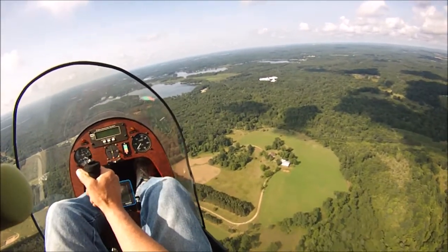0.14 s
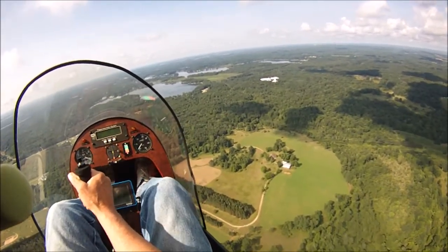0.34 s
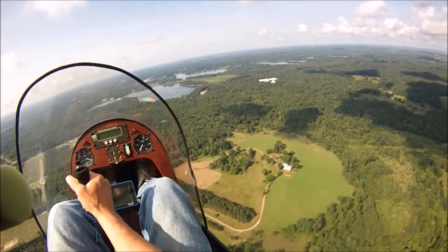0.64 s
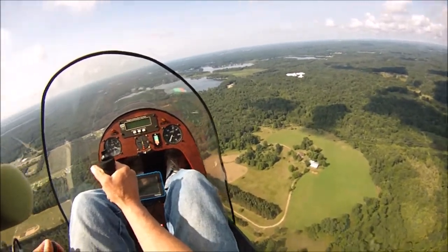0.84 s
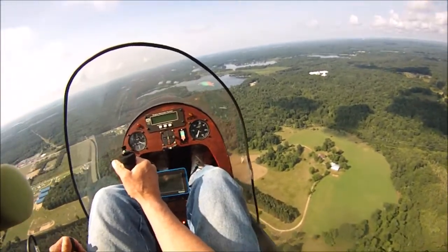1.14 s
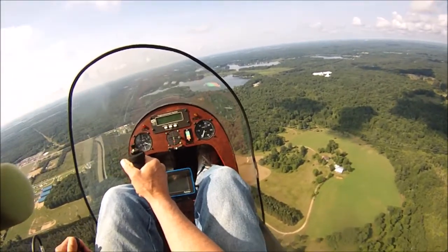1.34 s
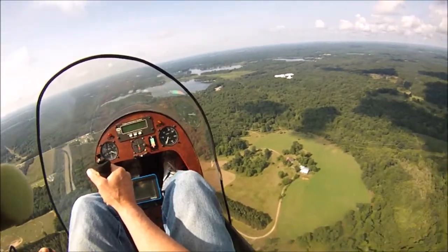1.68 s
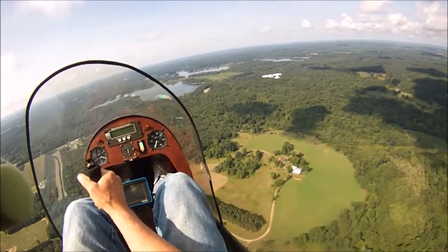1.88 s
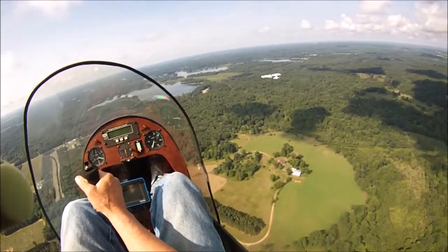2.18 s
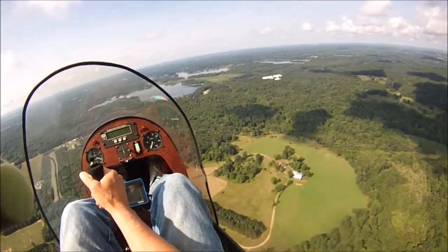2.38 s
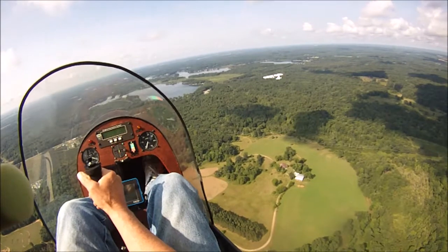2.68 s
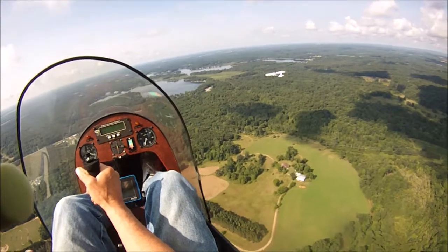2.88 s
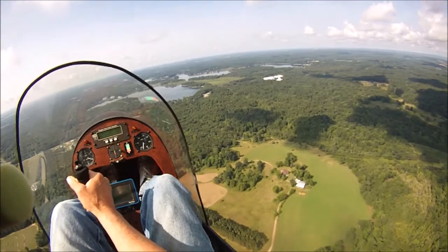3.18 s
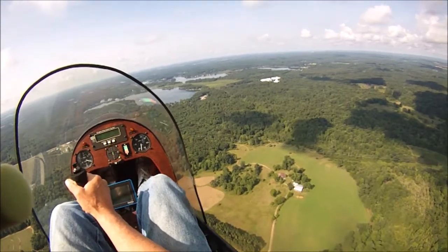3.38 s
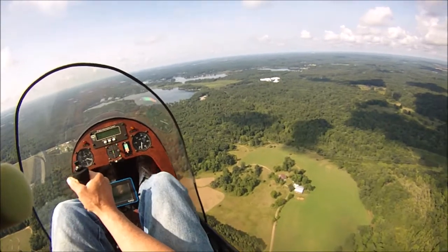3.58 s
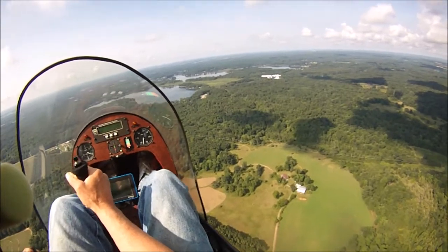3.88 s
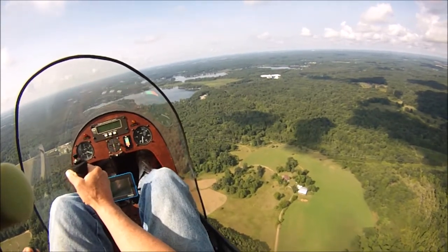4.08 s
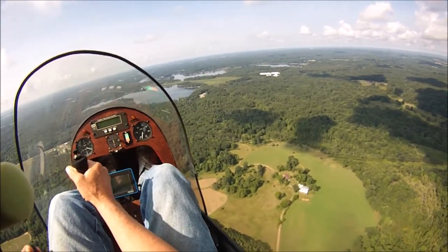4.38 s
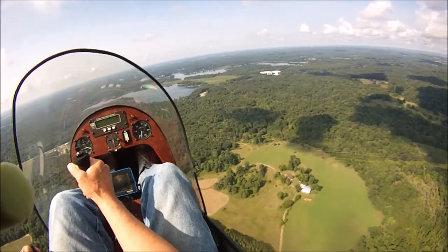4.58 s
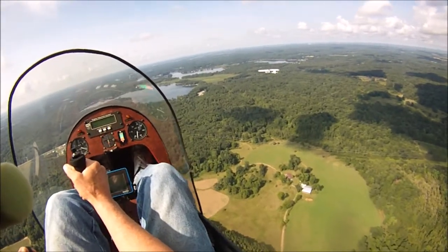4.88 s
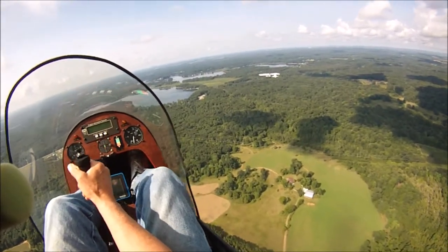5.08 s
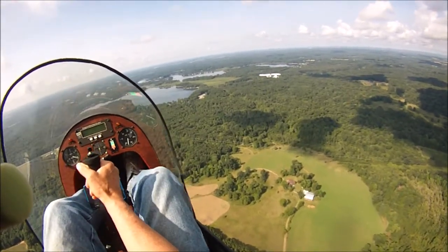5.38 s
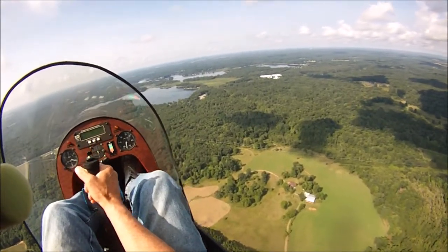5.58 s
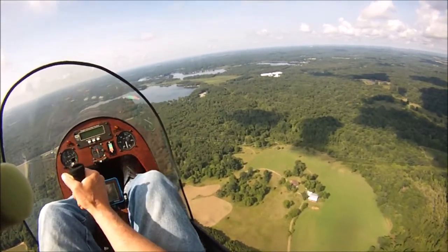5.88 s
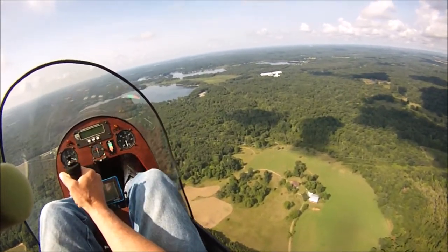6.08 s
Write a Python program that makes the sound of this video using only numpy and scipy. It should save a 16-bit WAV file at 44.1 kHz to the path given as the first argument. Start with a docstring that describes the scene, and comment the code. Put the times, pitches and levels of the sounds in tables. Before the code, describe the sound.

A small two-stroke aircraft engine drones at a steady cruising speed, with a wavering gear whine and a thin metallic buzz above it. The propeller adds a low, pulsing hum and a fluttering wash of air. The microphone sits in the open cockpit, where wind buffets it and hisses past the windscreen. The wind is gustiest at first, then eases a little, with a few short whooshes along the way.

```python
"""Ultralight in cruise, open cockpit

A two-cylinder two-stroke drones and whines behind the seat and drives a three-blade propeller through
a reduction gear, so two families of tones beat. The blades chop the air into a fluttering wash and
the airframe rasps. The slipstream buffets the microphone and hisses past the windscreen."""
import sys
import numpy as np
from scipy import signal
from scipy.fft import rfft, irfft, next_fast_len
from scipy.io import wavfile
from scipy.ndimage import map_coordinates

SR = 44100
rng = np.random.default_rng(int(sys.argv[2]) if len(sys.argv) > 2 else 0)


def master(y):
    """Save y as 16-bit WAV."""
    cut = np.clip(np.atleast_2d(y).T, -1, 1)
    pcm = np.round(cut * 32767)  # scale
    wavfile.write(sys.argv[1], SR, pcm.astype(np.int16))


N = 275625


def engine(turns):
    """Two firings a turn make the drone; casing and gears add ringing, whine, whistle and buzz."""
    # exhaust tones: t/s, level/dB at crank orders 1, 2, 4
    exhaust_levels = [(0.0, -46.5, -39.5, -44), (0.5, -45, -41, -49), (0.9, -43.5, -41, -52),
                      (1.3, -50, -41, -47.5), (1.9, -45.5, -38.5, -47), (2.5, -49, -39, -47),
                      (3.1, -40, -38, -48.5), (3.9, -43.5, -39, -46.5), (4.9, -43, -39.5, -50),
                      (5.4, -42, -37.5, -46), (5.75, -46, -40.5, -46), (6.25, -43.5, -37.5, -45.5)]
    # casing and gear tones: crank order, relative level/dB
    casing_orders = [(8, -16), (12, -10.5), (13, -13.5), (14, -10), (15, -20.5), (16, -15), (17, -7.5),
                     (18, -8), (19, -10), (21, -18.5), (22, -15.5), (23, -16.5), (24, -23), (25, -32),
                     (28, -27), (30, -36), (32, -28.5), (34, -28), (35, -21), (36, -15.5), (37, -20),
                     (38, -18.5), (40, -25.5), (41, -18.5), (42, -26), (44, -26.5), (50, -30.5), (60, -36),
                     (61, -36.5), (62, -36), (66, -40), (69, -37), (72, -40.5), (74, -36), (75, -40.5),
                     (76, -35.5), (83, -40), (84, -39), (87, -41), (90, -42), (93, -41), (106, -44)]
    # strongest casing tone: t/s, level/dB
    whine_levels = [(0.0, -60.5), (0.8, -61), (1.2, -62.5), (2.2, -59), (2.8, -61.5), (3.3, -60),
                    (3.7, -57.5), (4.25, -60), (4.5, -60), (4.9, -59.5), (5.3, -57.5), (5.7, -58.5),
                    (6.05, -54.5), (6.25, -53.5)]
    # faint high tone: t/s, level/dB
    whistle_levels = [(0.0, -90), (0.95, -83.5), (1.6, -85.5), (2.6, -87.5), (3.2, -93), (3.8, -85),
                      (4.6, -89), (5.25, -84), (5.7, -90), (6.25, -85)]
    whine_db, = curves(whine_levels)
    whistle_db, = curves(whistle_levels)
    drone = sum(amp(db) * tones(turns, [(order, 0)], waver_db=0.4, drift_rad=0.14)
                for order, db in zip((1, 2, 4), curves(exhaust_levels)))
    casing = amp(-58.5) * tones(turns, casing_orders, waver_db=2.5, drift_rad=0.38)
    whine = amp(whine_db) * tones(turns, [(20, 0)], waver_db=0.9, drift_rad=0.15)
    whistle = amp(whistle_db) * tones(turns, [(82, 0)], waver_db=0.8, drift_rad=0.6)
    return drone + casing + casing_swells(turns) + whine + whistle + amp(-77.5) * clatter(turns)


def casing_swells(turns):
    """Single casing tones rise and sink in smooth arches."""
    # swells: peak t/s, half-length/s, crank order, level/dB
    swells = [(0.48, 0.37, 18, -55.5), (0.99, 0.31, 18, -54), (1.9, 0.3, 18, -64.5), (3.2, 0.22, 18, -61),
              (3.51, 0.11, 18, -55.5), (3.95, 0.24, 18, -56.5), (4.6, 0.5, 18, -57),
              (5.43, 0.23, 18, -59.5), (5.95, 0.17, 18, -52), (0.53, 0.44, 32, -72), (5, 0.61, 32, -81),
              (3.25, 0.4, 72, -85), (6.15, 0.5, 74, -86.5), (1.6, 0.6, 76, -90), (5.8, 0.6, 76, -88.5),
              (5.95, 0.6, 76, -91), (4.7, 0.7, 84, -92.5), (5.15, 0.7, 106, -93)]
    t = np.arange(N) / SR
    out = np.zeros(N)
    for peak_s, half_s, order, db in swells:
        near = np.abs(t - peak_s) < half_s
        arch = np.cos(np.pi / 2 * (t[near] - peak_s) / half_s) ** 2
        phase = 2 * np.pi * (order * turns[near] + rng.random())
        out[near] += np.sqrt(2) * amp(db) * arch * np.sin(phase)
    return out


def clatter(turns):
    """Each crank turn repeats one rattle at a random strength: a thin buzz."""
    # buzz spectrum: f/Hz, relative level/dB
    buzz_spectrum = [(3400, -15.5), (3700, 0.5), (4500, 4), (5100, -4), (6000, -3.5), (6600, -0.5),
                     (7200, -6), (8300, -7), (10000, -20.5), (13000, -36.5)]
    tick_at = np.interp(np.arange(1, int(turns[-1])), turns, np.arange(N))
    strength = 1 + 0.3 * rng.standard_normal(len(tick_at))
    taps = tick_at.astype(int)[:, None] + np.arange(-7, 9)
    offset = taps - tick_at[:, None]
    ticks = strength[:, None] * np.sinc(offset) * np.sinc(offset / 8)  # sub-sample timing
    train = np.bincount(np.clip(taps, 0, N - 1).ravel(), ticks.ravel(), N)
    t = np.arange(SR // 20) / SR
    t60_s = 0.15
    ring = rng.standard_normal(len(t)) * amp(-60 * t / t60_s)  # dense metal modes smear each tick
    return coloured(signal.fftconvolve(train, ring)[:N], buzz_spectrum)


def propeller(passes, wind_db, gust_db):
    """Blades hum, thrum and chop disturbed air; gusts turn their weaker tones into wash."""
    # hum: t/s, level/dB at blade orders 2, 4
    hum_levels = [(0.0, -51, -51), (0.45, -36.5, -49.5), (0.75, -45, -46), (1.3, -38.5, -56),
                  (1.7, -40, -58), (2.4, -40, -66.5), (3.1, -35.5, -48), (3.5, -37.5, -53),
                  (4.8, -35.5, -55), (5.4, -38, -58.5), (6.0, -37.5, -51.5), (6.25, -41.5, -54.5)]
    # weaker tones: blade order, relative level/dB
    blade_orders = [(1, -17), (3, -15), (5, -30.5), (6, -23), (8, -38.5), (9, -35.5), (10, -34.5),
                    (11, -28.5), (12, -34), (13, -30), (14, -29.5), (15, -31.5), (16, -27.5), (17, -31),
                    (28, -42.5)]
    # low thrum: t/s, level/dB
    thrum_levels = [(0.0, -37.5), (0.5, -39), (1.1, -37), (1.55, -39.5), (1.75, -38), (2.0, -38.5),
                    (2.7, -41), (3.2, -42), (3.55, -37.5), (3.9, -44), (5.2, -42.5), (6.25, -41.5)]
    # chop: blade order, depth/dB
    chop_depths = [(1 / 3, 0.6), (1, 0.6), (2, 3.3), (3, 0.4), (4, 1.2)]
    # thrum and wash spectra: f/Hz, relative level/dB
    thrum_spectrum = [(140, -20.5), (176, -4), (198, -1), (214, -1), (231, -5), (256, -7.5), (301, -10.5),
                      (341, -12), (402, -16), (600, -32), (1200, -85)]
    wash_spectrum = [(500, -3.5), (780, -19), (1000, -4.5), (1400, 4), (1600, -1.5), (1800, -10.5),
                     (2080, -17.5), (2400, -19), (3300, -25.5), (3800, -33.5), (6000, -62.5)]
    hum = sum(amp(db) * tones(passes, [(order, 0)], waver_db=1.6, drift_rad=0.19)
              for order, db in zip((2, 4), curves(hum_levels)))
    weak_tones = amp(-36 - wind_db - gust_db) * tones(passes, blade_orders, waver_db=0.9, drift_rad=0.16)
    thrum_db, = curves(thrum_levels)
    thrum = amp(thrum_db + wobble(7.1)) * noise(thrum_spectrum)
    turbulence_db = 0.44 * wobble(40) + 0.35 * wobble(6.1)
    chop_db = ripple_db(passes, chop_depths)
    wash = amp(-52 + 1.44 * gust_db) * noise(wash_spectrum, chop_db + turbulence_db)
    return hum + weak_tones + thrum + wash


def slipstream(passes, wind_db, gust_db):
    """Air thumps the microphone, rushes round the cockpit and hisses at the windscreen's edge."""
    # air on the microphone: t/s, rumble level/dB, buffet level/dB
    thump_levels = [(0.0, -59, -40), (0.6, -52, -41.5), (1.15, -52, -38), (1.45, -56, -39),
                    (1.68, -58, -44), (1.9, -51, -40), (2.25, -63, -37.5), (2.6, -55, -42.5),
                    (2.92, -55, -35.5), (3.2, -45, -46.5), (3.5, -58, -39), (3.92, -46, -42),
                    (4.2, -44.5, -38), (4.55, -52, -44.5), (4.9, -43, -40), (5.2, -58, -41.5),
                    (5.45, -56.0, -37), (5.7, -54, -46), (6.25, -54, -40)]
    # air noise spectra: f/Hz, relative level/dB
    rumble_spectrum = [(10, -31.5), (22, -7.5), (32, 3), (48, 2), (62, 10), (90, -4.5), (200, -60.5),
                       (600, -110)]
    buffet_spectrum = [(30, -38), (55, -15.5), (78, -1.5), (105, 1), (122, 0.1), (142, 0.5), (166, -3),
                       (212, -19), (300, -33), (900, -110)]
    rush_spectrum = [(120, -20), (300, 4), (430, 1.8), (550, -3.5), (750, -9.5), (1000, -8.5), (1250, -11),
                     (1500, -15.5), (2000, -27.5), (4000, -70)]
    hiss_spectrum = [(1000, -6.5), (2500, 0), (3600, 2), (4400, 0.2), (5200, -7), (6600, -9), (8000, -13.5),
                     (10000, -21.5), (12500, -39.5)]
    eddies = wobble(45)
    flutter_db = ripple_db(passes, [(1, 0.41), (2, 0.37)])
    sputter_db = (0.55 + 0.17 * gust_db) * wobble(110)
    rumble_db, buffet_db = curves(thump_levels)
    rush_db = -52.5 + 1.4 * wind_db + eddies + 0.49 * wobble(5.5)
    hiss_db = -67.5 + 0.89 * wind_db + 0.44 * eddies + flutter_db + sputter_db
    rumble = amp(rumble_db + 0.89 * eddies) * noise(rumble_spectrum)
    buffet = amp(buffet_db + 0.81 * eddies) * noise(buffet_spectrum)
    return rumble + buffet + amp(rush_db) * noise(rush_spectrum) + amp(hiss_db) * noise(hiss_spectrum)


def puffs():
    """Single eddies strike the cockpit as short whooshes; a bright hiss leads the strongest."""
    # whooshes and bright edge: peak t/s, length/s, level/dB
    whooshes = [(0.788, 0.068, -41), (1.518, 0.1, -47.5), (4.292, 0.059, -47), (6.088, 0.095, -46)]
    edge = (0.765, 0.09, -70.5)
    # their spectra: f/Hz, relative level/dB
    whoosh_spectrum = [(120, -24), (260, 0.5), (400, 5.5), (600, -11), (1000, -18.5), (2000, -37),
                       (4000, -50.5), (8000, -74.5)]
    edge_spectrum = [(1500, -20), (3000, 0), (5000, -1), (8000, -7), (12500, -13)]
    t = np.arange(N) / SR

    def bump(peak_s, length_s, db):
        return amp(db) * np.exp(-((t - peak_s) / (length_s / 2)) ** 2)

    whoosh = sum(bump(*row) for row in whooshes) * noise(whoosh_spectrum)
    return whoosh + bump(*edge) * noise(edge_spectrum)


def airframe(turns, passes, wind_db):
    """Rough vibration, pulsing with firings and blades, rasps broadly and rings the frame."""
    # frame resonances: f/Hz, width/Hz, relative level/dB
    modes = [(2370, 30, -2), (2455, 25, -5.5), (2574, 41, 1), (2655, 30, 1.5), (2760, 54, 3.5),
             (2820, 30, 5), (2918, 40, 12), (3025, 70, 5), (3180, 32, -1.5), (3325, 48, 1.5)]
    # rasp spectrum: f/Hz, relative level/dB
    rasp_spectrum = [(1700, -25.5), (2050, -9), (2400, 2), (2900, -1), (3300, 1), (3700, -15.5),
                     (5000, -41.5)]

    def response(hz):
        return sum(amp(db) * 1j * hz * width_hz / (mode_hz ** 2 - hz ** 2 + 1j * hz * width_hz)
                   for mode_hz, width_hz, db in modes)

    pulse_db = ripple_db(turns, [(1, 1.1), (2, 0.5)]) + ripple_db(passes, [(2, 0.4)])
    shake = rng.standard_normal(N) * amp(pulse_db + 0.5 * wobble(35))
    ringing = amp(-67 - 0.37 * wind_db) * unit(filtered(shake, response))
    return ringing + amp(-65) * noise(rasp_spectrum, pulse_db)


def tones(cycles, orders, waver_db, drift_rad):
    """Shaft-locked tones from (order, level/dB) rows; turbulent air wavers level and phase."""
    out = np.zeros(N)
    for order, db in orders:
        phase = 2 * np.pi * (order * cycles + rng.random()) + drift_rad * wobble(6)
        out += np.sqrt(2) * amp(db + waver_db * wobble(9)) * np.sin(phase)
    return out


def ripple_db(cycles, depths):
    """Shaft-locked level ripple from (order, depth/dB) rows."""
    return sum(db * np.cos(2 * np.pi * order * cycles) for order, db in depths)


def noise(spectrum, modulation_db=0):
    """White noise, modulated, then coloured; rms 1."""
    return coloured(rng.standard_normal(N) * amp(modulation_db), spectrum)


def coloured(x, spectrum):
    """x through (f/Hz, level/dB) points on a log frequency axis; rms 1."""
    knots_hz, db = np.transpose(spectrum)
    return unit(filtered(x, lambda hz: amp(np.interp(np.log(hz + 1), np.log(knots_hz + 1), db))))


def filtered(x, response):
    """x through a frequency response."""
    size = next_fast_len(N + SR // 4)
    return irfft(rfft(x, size) * response(np.fft.rfftfreq(size, 1 / SR)), size)[:N]


def wobble(rate_hz):
    """Smooth random curve, rate_hz knots a second."""
    at = np.linspace(0, N, 2048)
    smooth = map_coordinates(rng.standard_normal(1024), [at * rate_hz / SR], mode="wrap")
    return np.interp(np.arange(N), at, smooth)


def curves(rows):
    """One per-sample curve for each column after t/s."""
    times_s, *columns = np.transpose(rows)
    return [np.interp(np.arange(N) / SR, times_s, column) for column in columns]


def amp(db):
    """dB to gain."""
    return 10 ** (np.asarray(db) / 20)


def unit(x):
    """Scale to rms 1."""
    return x / np.sqrt(np.mean(x ** 2) + 1e-20)


def scene():
    """The crankshaft drives engine and propeller; wind shifts the balance from tones to noise."""
    # crank rate under small throttle changes: t/s, f/Hz
    crank_rates = [(0.0, 79.36), (1.4, 78.47), (2.0, 78.45), (2.5, 78.3), (3.05, 78.82), (3.85, 78.32),
                   (4.85, 78.65), (5.5, 78.34), (6.25, 77.56)]
    # wind on the cockpit, gusty at first: t/s, level/dB over calm cruise
    wind_levels = [(0.0, 5.5), (0.15, 5), (0.45, 4.5), (0.6, 5.5), (0.78, 5), (1.0, 3.5), (1.25, 3),
                   (1.55, 3.5), (1.9, 2.5), (2.2, 2.5), (2.9, 0), (3.55, 1), (4.2, -0.5), (5.0, 0),
                   (5.5, 0.5), (5.8, 2.5), (6.05, -0.5), (6.25, 0.5)]
    blades, gear_ratio, gust_threshold_db = 3, 2.579, 3
    crank_hz, = curves(crank_rates)
    turns = np.cumsum(crank_hz) / SR
    passes = blades * turns / gear_ratio
    wind_db, = curves(wind_levels)
    gust_db = np.maximum(wind_db - gust_threshold_db, 0)
    machine = engine(turns) + airframe(turns, passes, wind_db) + propeller(passes, wind_db, gust_db)
    return (machine + slipstream(passes, wind_db, gust_db) + puffs())[None]


def record(dry):
    """Brick-wall low-pass."""
    return filtered(dry[0], lambda hz: hz < 12750)[None]


dry = scene()
out = record(dry)
master(out)
```